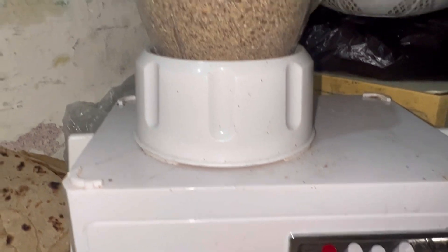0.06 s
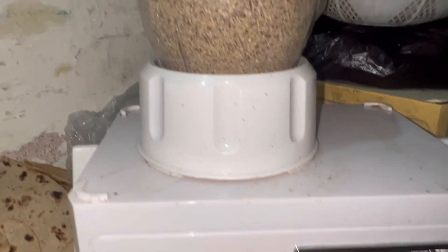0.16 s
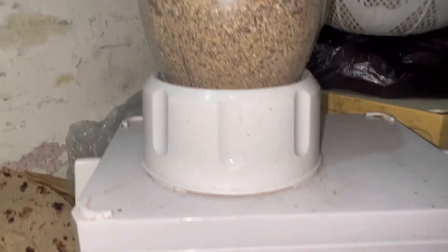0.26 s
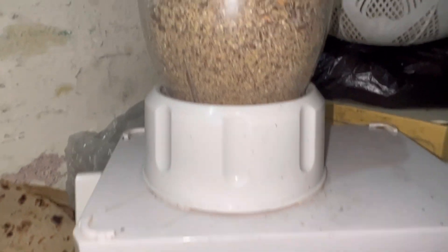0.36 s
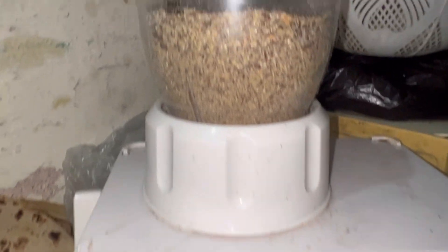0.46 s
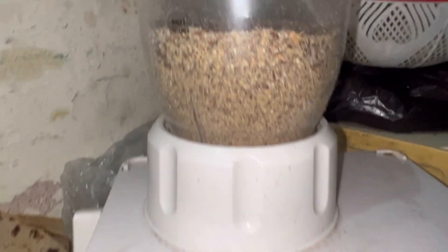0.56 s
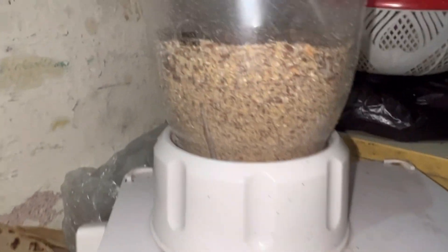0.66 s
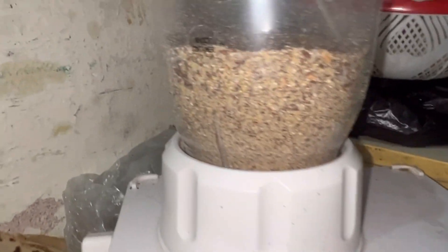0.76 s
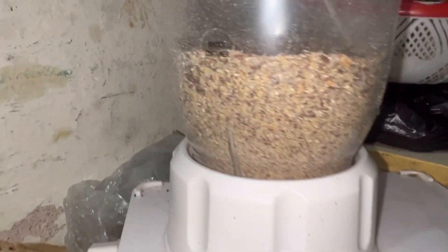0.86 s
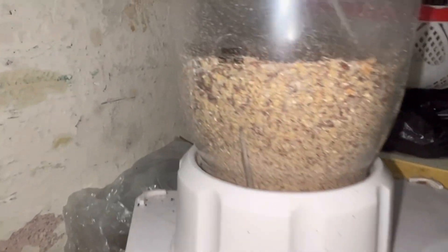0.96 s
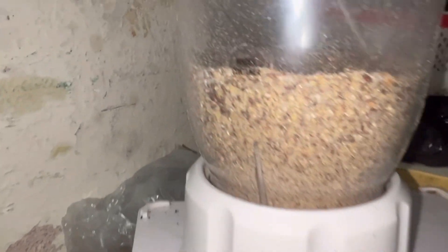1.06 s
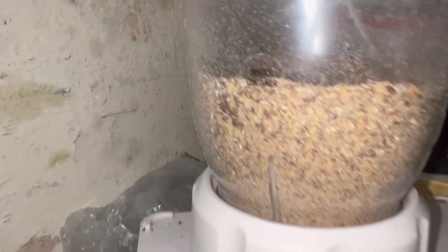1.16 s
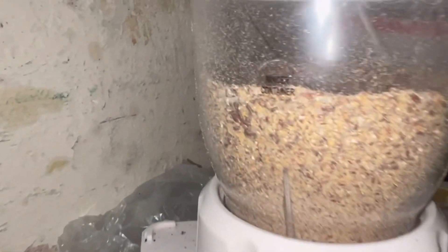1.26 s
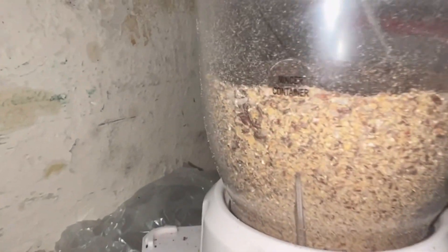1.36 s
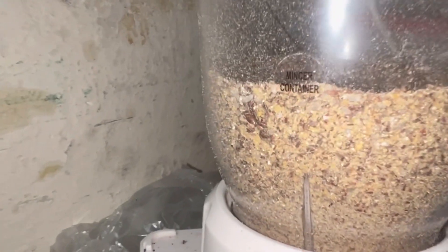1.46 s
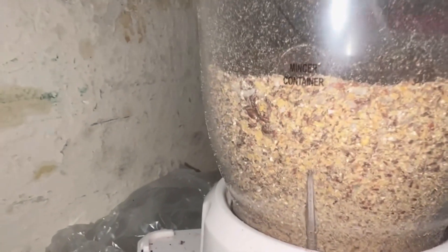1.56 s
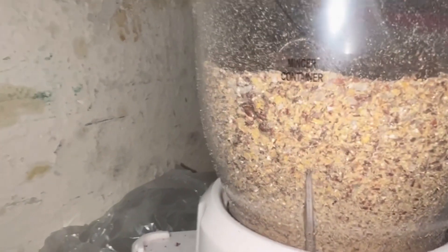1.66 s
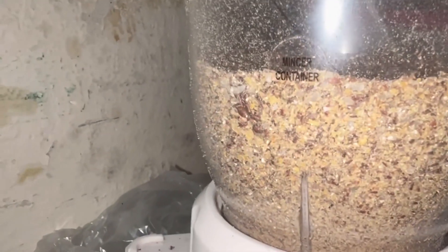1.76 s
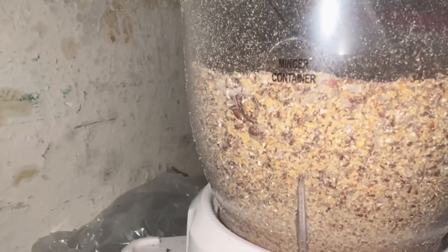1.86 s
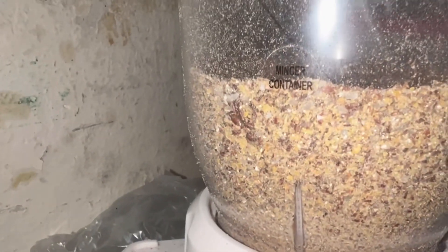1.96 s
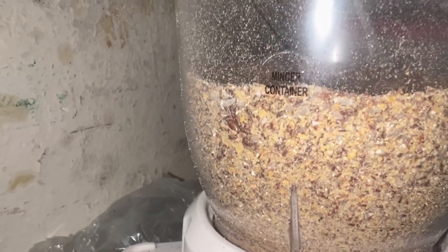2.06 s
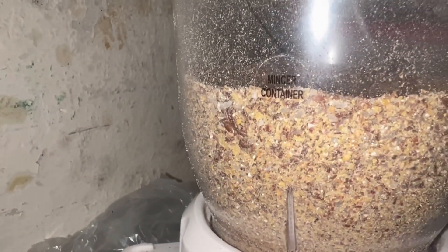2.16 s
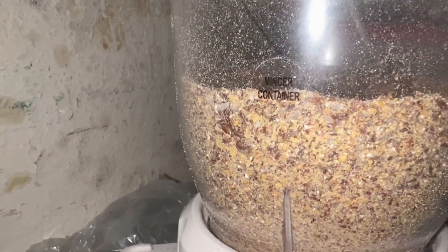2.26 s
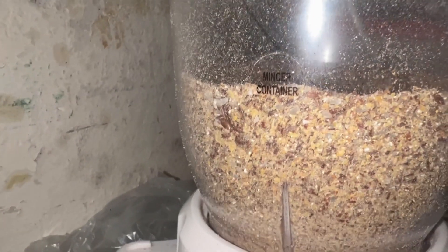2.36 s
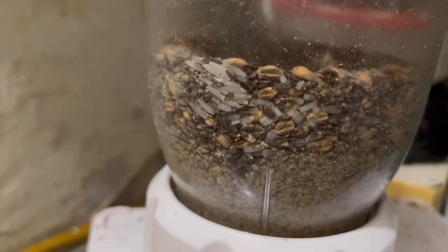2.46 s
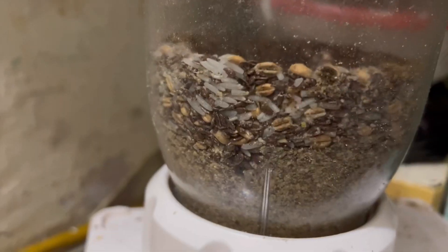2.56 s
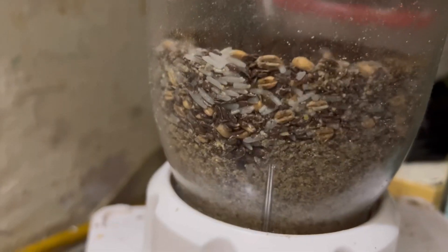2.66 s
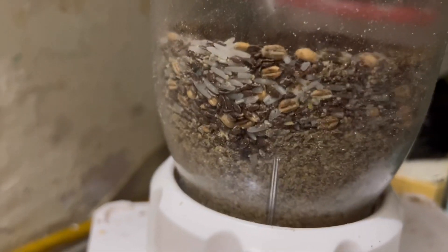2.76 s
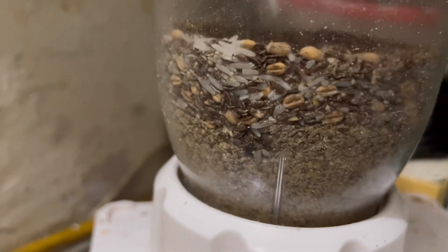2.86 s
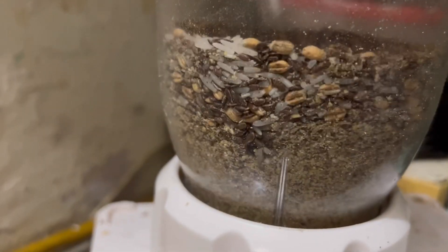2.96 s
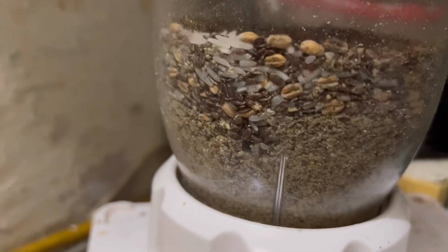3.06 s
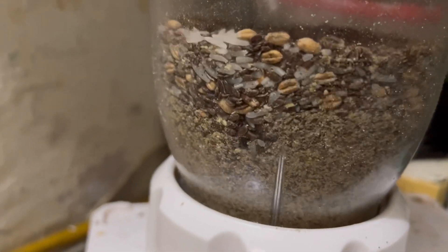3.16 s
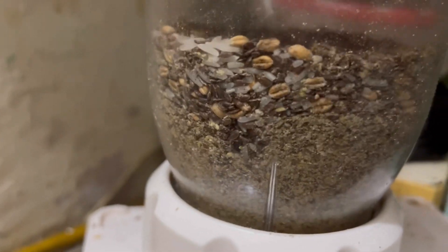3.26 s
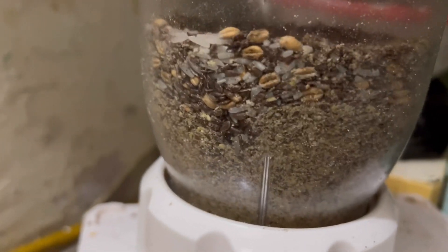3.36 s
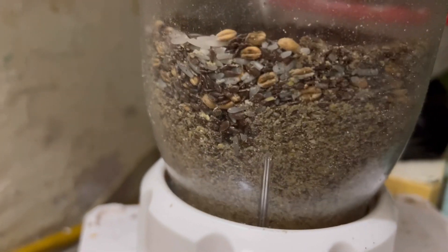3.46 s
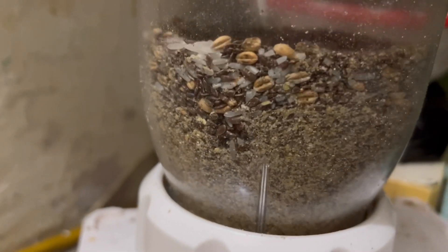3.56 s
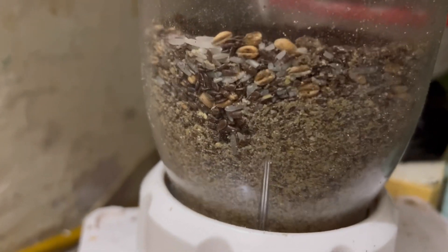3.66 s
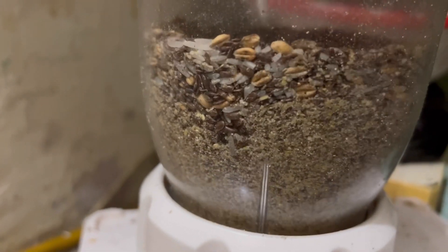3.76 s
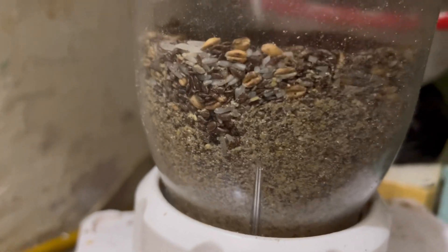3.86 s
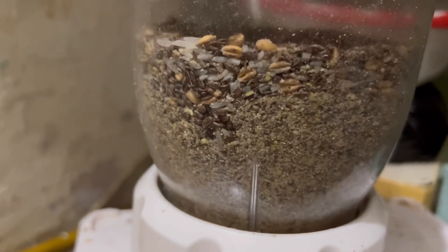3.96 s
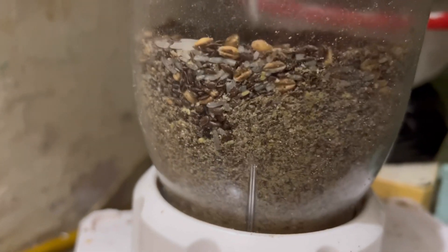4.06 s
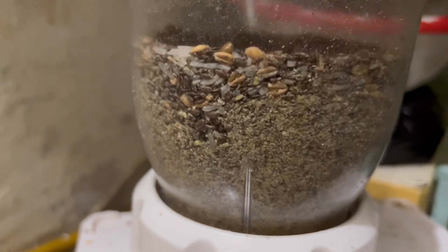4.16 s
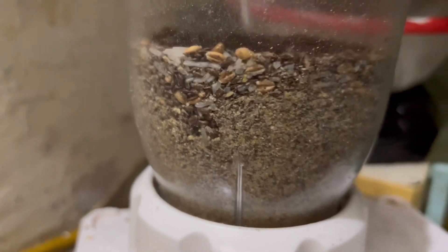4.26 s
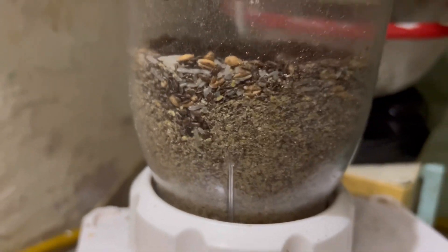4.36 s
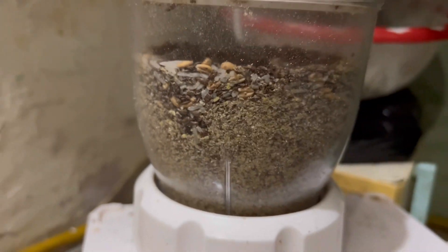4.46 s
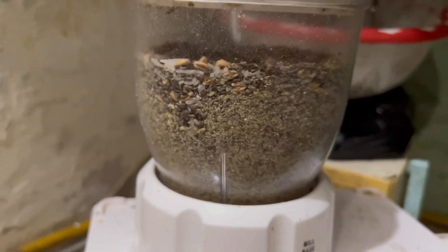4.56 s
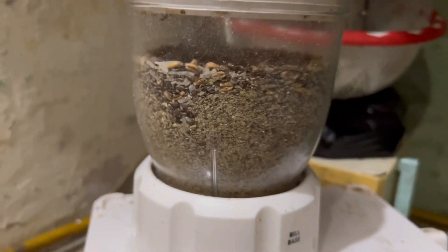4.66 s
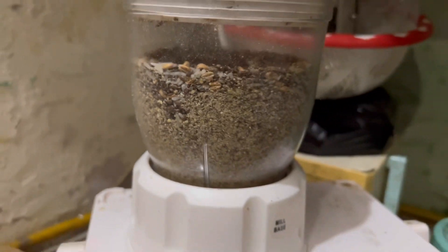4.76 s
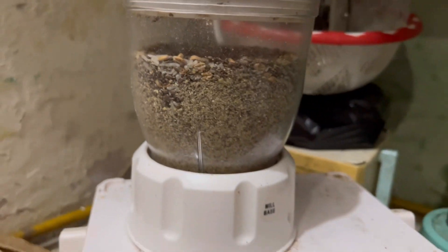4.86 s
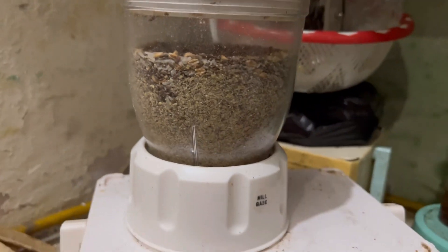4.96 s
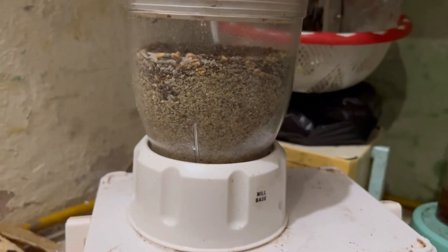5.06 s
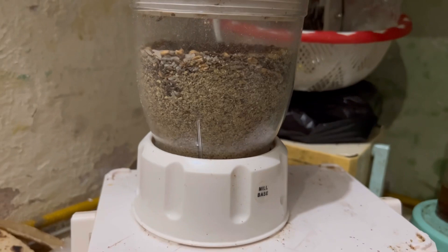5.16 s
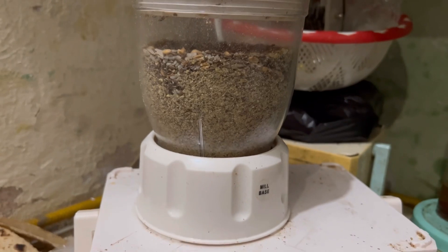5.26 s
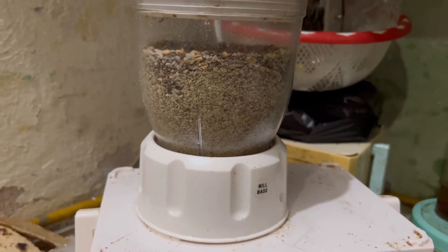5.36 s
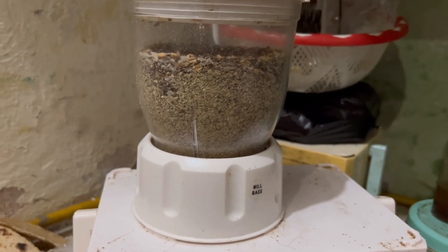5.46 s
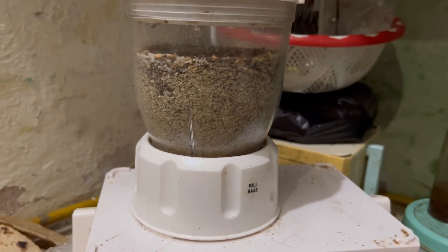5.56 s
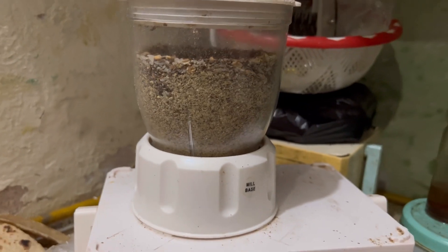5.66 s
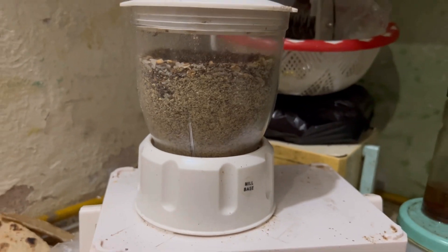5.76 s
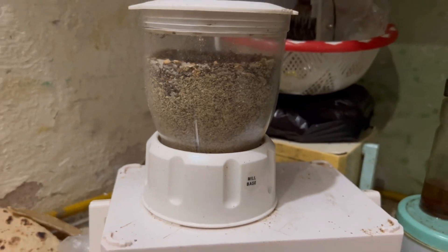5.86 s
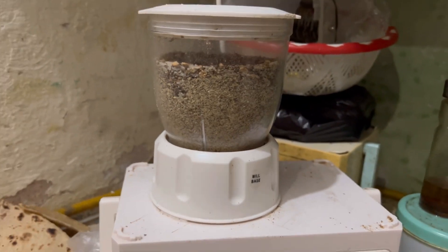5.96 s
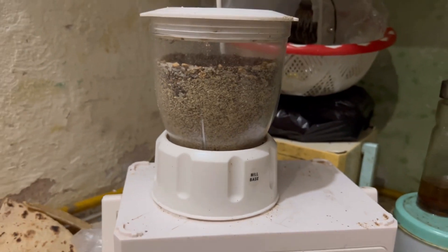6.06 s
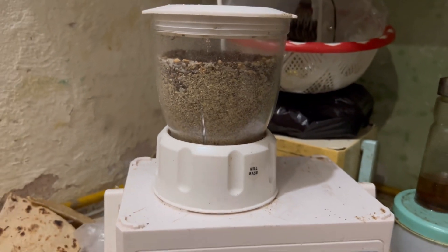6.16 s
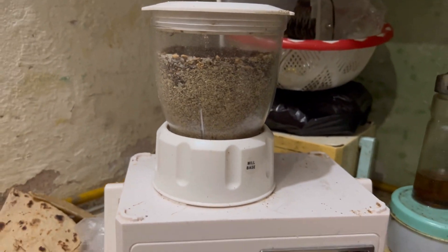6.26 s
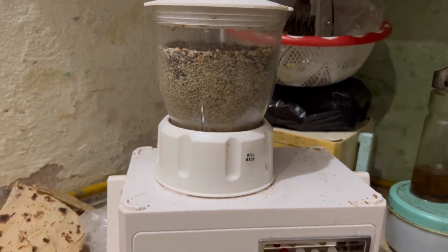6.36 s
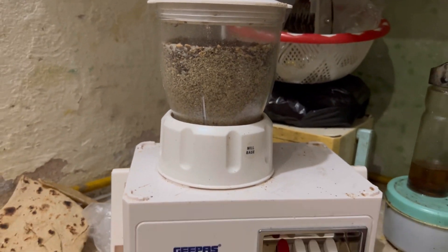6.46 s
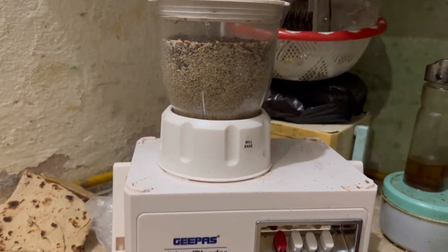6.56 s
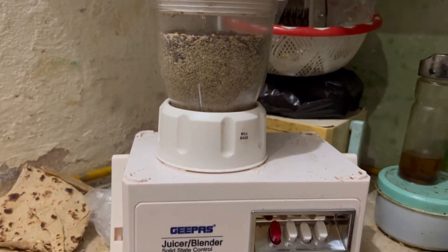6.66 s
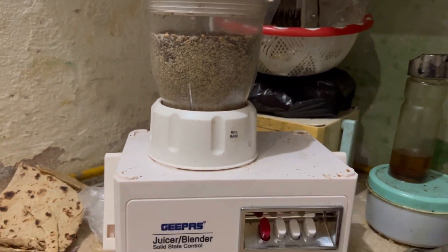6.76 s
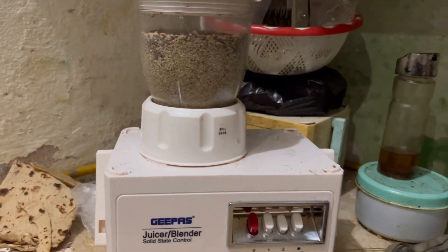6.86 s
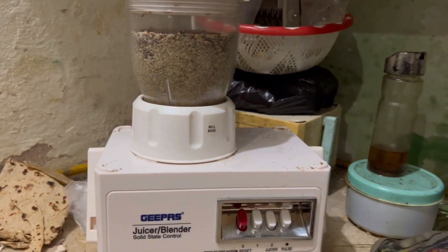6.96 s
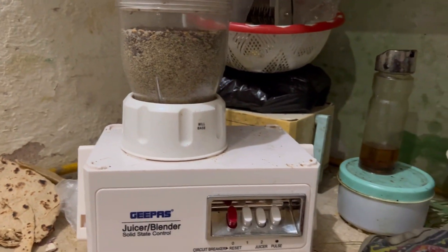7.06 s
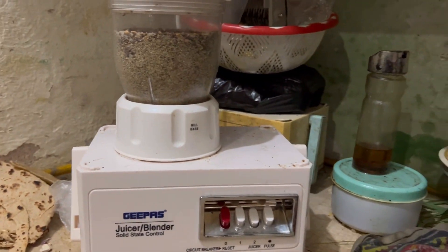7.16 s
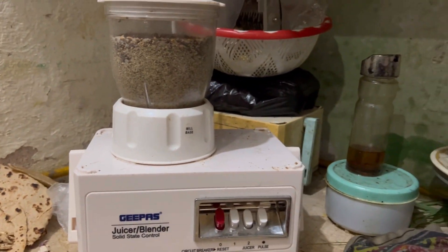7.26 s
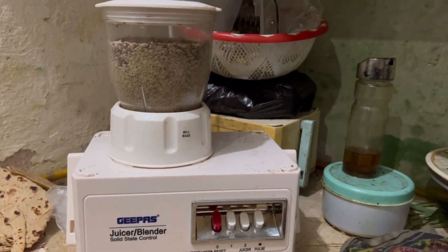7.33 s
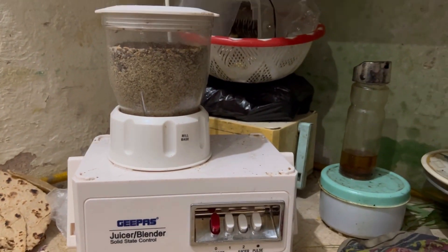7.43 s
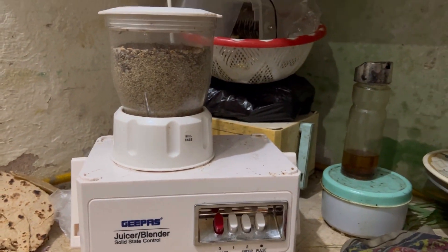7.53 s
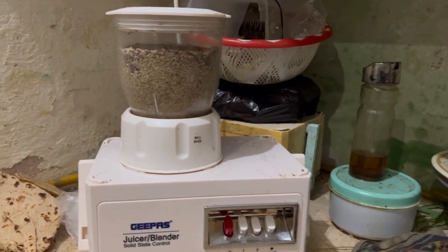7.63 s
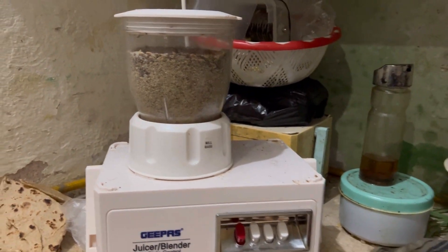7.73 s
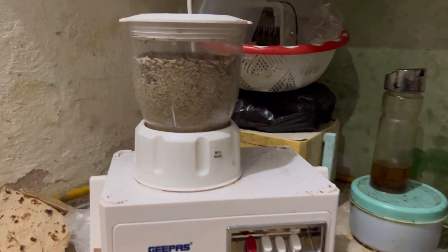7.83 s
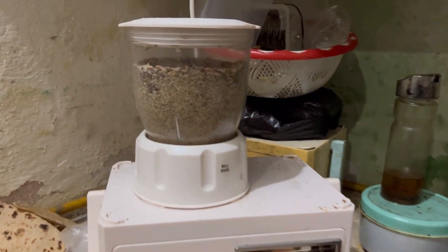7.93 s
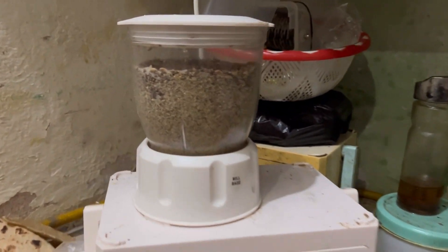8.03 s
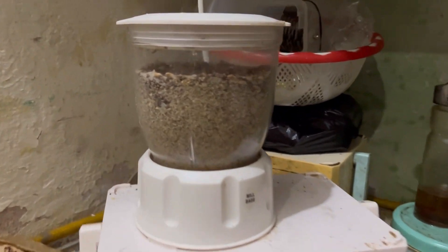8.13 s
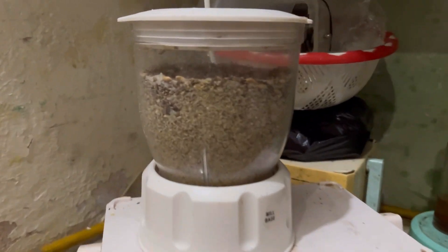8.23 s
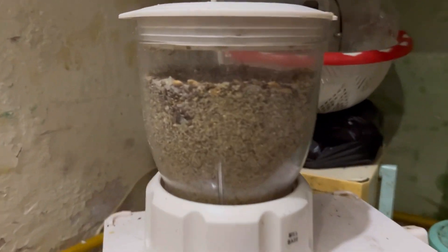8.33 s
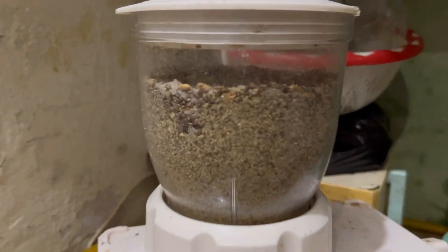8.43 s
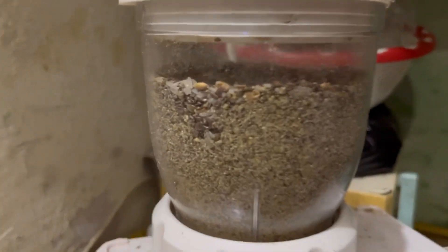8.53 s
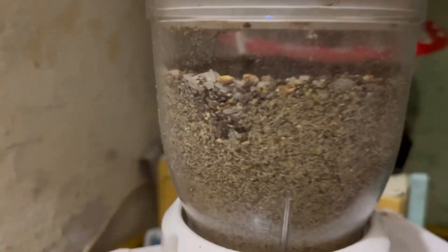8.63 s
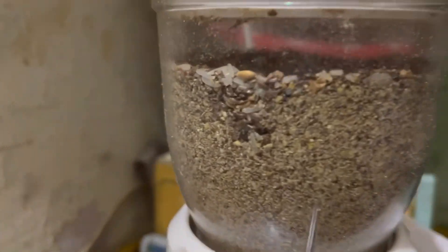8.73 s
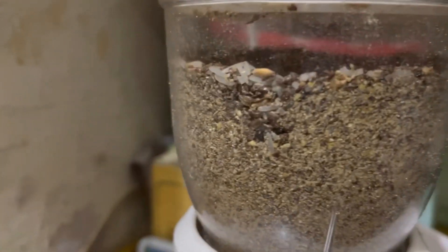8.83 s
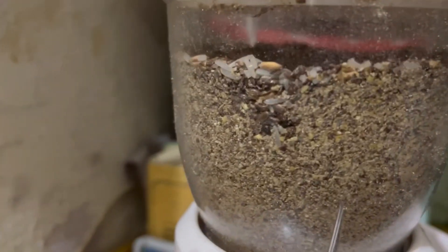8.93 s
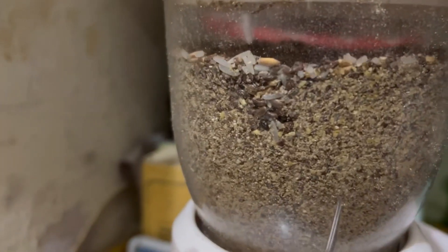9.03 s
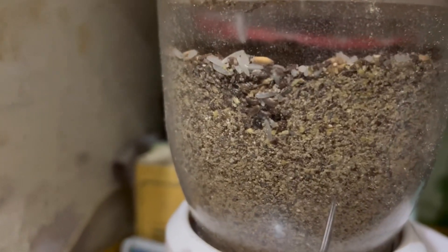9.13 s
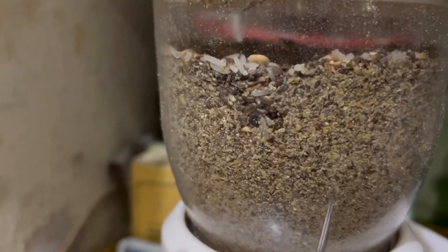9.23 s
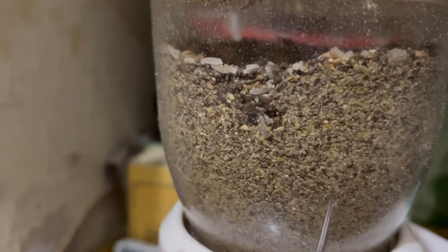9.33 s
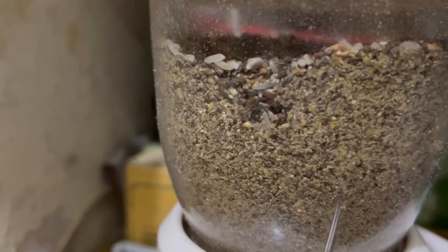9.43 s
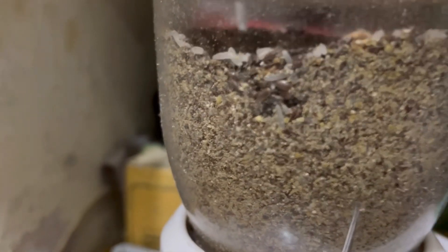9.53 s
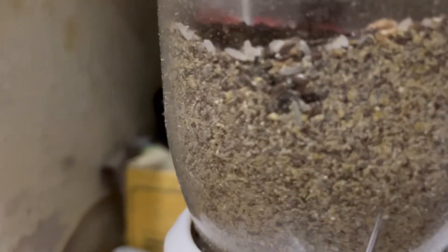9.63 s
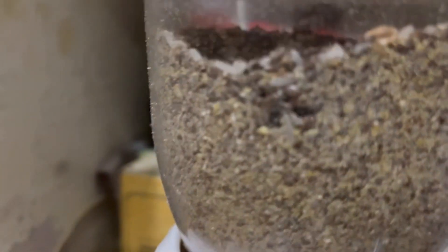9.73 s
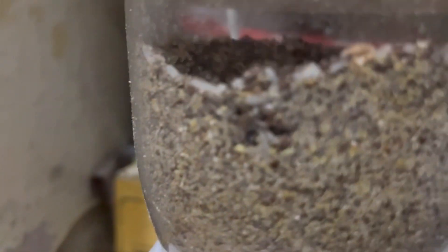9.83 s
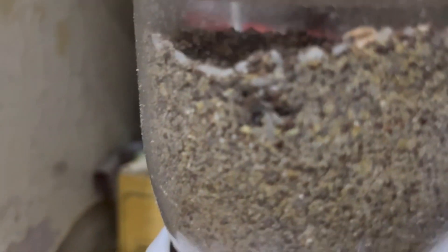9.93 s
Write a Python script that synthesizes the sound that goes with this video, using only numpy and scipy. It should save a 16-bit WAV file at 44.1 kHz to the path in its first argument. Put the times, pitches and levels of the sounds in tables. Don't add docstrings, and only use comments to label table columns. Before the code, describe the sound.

An electric grinder runs continuously with dry grain in its jar, heard close in a small hard-walled kitchen. A low motor hum sits under a dense gritty rush and occasional hard seed knocks. Around 2.4 seconds it cuts abruptly to a higher speed, hissier and with less hum. The microphone draws back, so the noise softens, then moves in again and it grows loud to the end.

```python
import sys
import numpy as np
from scipy import signal
from scipy.fft import rfft, irfft, next_fast_len
from scipy.io import wavfile
from scipy.ndimage import uniform_filter1d, map_coordinates

SR = 44100
rng = np.random.default_rng(int(sys.argv[2]) if len(sys.argv) > 2 else 0)


def to_wav(s):
    ch = np.atleast_2d(s).T
    pcm = np.round(np.clip(ch, -1, 1) * 32767)
    wavfile.write(sys.argv[1], SR, pcm.astype(np.int16))


def volts(x):
    e = np.asarray(x, float) / 20
    return 10 ** e


N = 440554
T = np.arange(N) / SR
CUT_S = 2.4333
TAPS = 8192


def curves(table):
    s, *columns = np.transpose(table)
    return [np.interp(T, s, c) for c in columns]


def at_places(place, table):
    return [np.interp(place, range(len(c)), c) for c in np.transpose(table)]


def unit(x):
    return x / np.sqrt(np.mean(x ** 2))


def walk(rate):
    k = max(int(SR / rate), 2)
    held = np.repeat(rng.standard_normal(size=1000)[:N // k + 1], k)
    return unit(uniform_filter1d(uniform_filter1d(held, k), k)[:N])


def shaft_speed(slow):
    # t/s, shaft f/Hz
    low_speed = [
        (0.0, 173.7),
        (0.11, 177.3),
        (1.47, 179.9),
        (2.43, 181.4),
    ]
    # t/s, shaft f/Hz
    high_speed = [(2.46, 294), (2.9, 290.3), (4.25, 292), (5.8, 286.5), (6.45, 292.5), (7.02, 311),
                  (7.3, 300), (7.7, 292), (8.08, 298), (8.4, 293), (8.7, 280), (9.3, 282), (9.55, 278.5),
                  (9.99, 282)]
    wander_hz = 1.0
    return np.where(slow, *curves(low_speed), *curves(high_speed)) + ~slow * wander_hz * walk(4)


def motor(turn, slow, place, shaft_db, buzz_db, ripple_db):
    # multiple of the shaft rate, level/dB under the shaft line
    even_orders = [
        (2, -21.5),
        (4, -19.5),
        (6, -21),
        (8, -17.5),
        (12, -27),
    ]
    # third multiple level/dB, fifth multiple level/dB
    odd_orders = [
        (-40, -42),
        (-38, -35),
    ]
    mains_hz, pan_db, lead_rad = 50.05, 3.5, -0.21
    side = np.array([[1], [-1]])
    field = 2 * np.pi * 2 * mains_hz * T
    spin = turn + 0.15 * walk(25) - side * lead_rad / 2
    ripple = sum(volts(ripple_db + db) * np.sin(spin + k * field) for k, db in ((-1, 0), (1, -7)))
    shaft = volts(shaft_db + np.where(slow, 0.45, 1.1) * walk(16)) * (np.sin(spin) + ripple)
    third_db, fifth_db = at_places(place, odd_orders)
    orders = [(3, third_db), (5, fifth_db)] + [(k, shaft_db + db) for k, db in even_orders]
    upper = 0
    for k, db in orders:
        level = volts(db + 1.1 * np.sqrt(k) * walk(14))
        upper = upper + level * np.sin(k * turn + 0.15 * k * walk(18))
    buzz = volts(buzz_db + 1.1 * walk(10)) * np.sin(np.where(slow, 1, 2) * field)
    return np.sqrt(2) * (shaft + slow * upper + buzz) * volts(side * pan_db / 2)


def knocks(level_db):
    # t/s, peak level/dB
    hard_seeds = [(0.4674, -16), (1.059, -14), (1.5689, -8.5), (2.3224, -11), (2.601, -13), (2.8907, -17),
                  (3.2411, -14), (3.5144, -15), (4.2352, -12), (4.3464, -22), (5.5434, -23), (5.576, -26),
                  (5.6885, -18), (6.3493, -22), (7.2644, -20), (8.4523, -18), (9.0298, -11), (9.5597, -13),
                  (9.648, -10)]
    out = np.zeros(N)
    tail = np.arange(900) / SR
    decay = np.exp(-tail / 0.0018) + 0.5 * np.exp(-tail / 0.0097)
    for s, db in hard_seeds:
        i = int(s * SR)
        burst = rng.standard_normal(len(tail)) * decay
        out[i:i + len(tail)] += volts(db - level_db[i] - 7.0) * burst[:N - i]
    return out


def seeds(turn, slow, count):
    size = next_fast_len(N + 4096)
    f = np.arange(size // 2 + 1) * SR / size
    surge = 0.33 * walk(14) + 0.65 * walk(45)
    sizes = rng.exponential(size=(count, N // 8 + 1)).clip(0, 6)
    sizes = volts(1.99 * np.repeat(sizes, 8, axis=1)[:, :N])
    hits = rfft(unit(rng.standard_normal((count, N)) * sizes), size)
    once, twice = 0.093, np.where(slow, 0.15, 0.06)
    out = 0
    for hz in 250 * 2.0 ** np.arange(7):
        distance = np.log2(np.clip(f, 250, 16000) / hz)
        octave = np.cos(np.pi / 2 * np.clip(distance, -1, 1)) ** 2
        treble = np.clip(np.log2(hz / 700) / 4, 0, 1)
        blade = 1 + treble * (once * np.cos(turn) + twice * np.cos(2 * turn))
        flicker = 0.24 * walk(5.4) + 0.46 * walk(22)
        load = volts(np.sqrt(treble + 0.067) * surge + flicker) * blade
        out = out + load * irfft(hits * octave, size)[:, :N]
    return out


def jar_ring(air, jar):
    f = np.arange(TAPS // 2 + 1) * SR / TAPS
    air_hz, air_db = np.transpose(air)
    db = np.interp(np.log(f + 1), np.log(air_hz), air_db)
    db = db + sum(lift / (1 + (2 * (f - hz) / width) ** 2) for hz, width, lift in jar)
    cepstrum = irfft(np.log(volts(db)))
    cepstrum[1:TAPS // 2] *= 2
    cepstrum[TAPS // 2 + 1:] = 0
    return irfft(np.exp(rfft(cepstrum)))


def kitchen_bounces():
    decay = np.exp(-np.arange(TAPS) / SR / 0.011)
    bounces = volts(-35.5) * np.diff(rng.standard_normal(TAPS + 1)) * decay
    bounces[0] = 1
    return bounces


def heard(streams, air, jar, ports):
    size = next_fast_len(streams.shape[1] + TAPS)
    f = np.arange(size // 2 + 1) * SR / size
    ring = rfft(jar_ring(air, jar), size) * rfft(kitchen_bounces(), size)
    middle = (f > 600) & (f < 9000)
    ring /= np.sqrt(np.sum(np.abs(ring[middle]) ** 2) / len(f))
    direct, *spread = rfft(streams, size)
    port_hz, *columns = np.transpose(ports)
    like, lead, pan_db = (np.interp(f, port_hz, c) for c in columns)
    like = np.clip(like, 0, 1)
    pair = []
    for side, own in zip((1, -1), spread):
        shared = np.sqrt(like) * np.exp(-0.5j * side * lead) * direct
        pair.append(volts(side * pan_db / 2) * (shared + np.sqrt(1 - like) * own))
    return irfft(ring * np.array(pair), size)[:, :streams.shape[1]]


def phone_places():
    # f/Hz, level/dB
    slow_air = [(30, -42), (70, -23.5), (130, -16.5), (250, -19.5), (650, -14), (1250, -13), (2500, -12.5),
                (4000, -15), (6500, -19), (8500, -16.5), (11500, -20.5), (12500, -23), (15500, -26)]
    fast_air = [(30, -57), (80, -40), (130, -32.5), (180, -21), (450, -17.5), (900, -18), (1550, -11),
                (2600, -11), (4500, -10), (7600, -15.5), (10000, -12.5), (13000, -16), (15600, -15.5)]
    # f/Hz, width/Hz, lift/dB at places 0, 1
    slow_jar = [(337, 94, 12.5, 14.3), (944, 126, 8, 13), (1067, 120, 8.5, 5.7), (1430, 210, 6.5, 5.8),
                (1824, 120, 2, 13.5), (2100, 72, 3, 1.3333), (2833, 220, 13, 6.3), (3070, 160, 1, 8.8),
                (5220, 156, 12.5, 10.8), (5440, 150, 8, 4.3), (7740, 250, -1, 5.3), (9740, 300, 7, 2.8),
                (11100, 1100, 3.5, 4.8)]
    # f/Hz, width/Hz, lift/dB (negative: dip) at places 2, 3, 4, 5
    fast_resonances = [(706, 330, 12.5, 12.5, 11, 14), (844, 120, -9, -9.5, -8.5, -9),
                       (1364, 310, 8.5, 12, 12, 9.5), (1540, 73, -5, -13, -4.5, -4.5),
                       (1712, 44, 4.5, 8.5, -7, 9), (1890, 252, 12.5, 8.5, 6, 12.5),
                       (2256, 120, 2, 6.5, 4, 4.5), (2683, 120, 7.5, 1.5, 2, 5), (2980, 220, -3, 1, -3, 1.5),
                       (3599, 157, 11.5, 2, 2.5, 10.5), (3900, 92, -11, -6, 8, -4),
                       (4030, 400, 3, -0.5, -3.5, 0.5),
                       (4930, 120, -10, 6, -1, -1.5), (5550, 260, 9, 5, 8.5, 9.5), (5920, 120, 3, 9.5, 7.5, 6),
                (6520, 530, 9, 8.5, 4.5, 6.5), (7780, 620, -1, 6, 3, 4), (8800, 260, -3, -9, -1, -15),
                (9350, 230, 6.5, 1.5, 2, 4), (10480, 360, -1, 7.5, 5, 6.5), (11050, 680, 1, 5.5, 7, -0.5),
                (12450, 560, 7.5, 4, 1, 6.5), (13500, 400, -9, 1, -5.5, -3), (15400, 760, 7, 2, 3, 5)]
    # f/Hz, likeness/0-1, right leads/rad, left minus right/dB
    slow_ports = [(60, 0.7, 0, 1), (250, 0.99, 0.45, 3.5), (920, 0.82, 0.3, 2.5), (1280, 0.31, 1, 2.5),
                  (1800, 0.7, 1.06, 3), (2620, 0.6, -1, 3.5), (3840, 0.94, 0.9, 2.2), (5200, 0.55, -0.3, 5),
                  (6500, 0.94, 0.5, 1), (8900, 0.88, 0.4, 0.5), (9820, 1, 3, 0), (10490, 1, 3.3, 0),
                  (11700, 1, 6, 0), (12600, 1, 6.6, 0), (13300, 1, 9.2, 0), (14300, 1, 9.6, 0),
                  (15100, 1, 12.4, 0)]
    near_ports = [(60, 0.9, -0.28, -1), (300, 0.79, 1, 5), (804, 1, -0.55, 0), (1570, 0.87, -0.63, 2.5),
                  (2620, 0.37, 0.98, 4.5), (3400, 0.59, 0.76, 4), (4500, 0.94, 0.43, 2.5),
                  (5500, 0.89, -1.25, 4.5), (6600, 0.48, -0.77, 4), (7100, 0.94, -0.2, 0),
                  (8600, 1, -0.58, 3.5), (10300, 0.3, 0, 6), (11800, 0.94, 0, -1), (14200, 0.98, 0, 0),
                  (15200, 0.69, -0.53, 1)]
    far_ports = [(60, .95, 2, 0), (300, 0.95, 0.3, -3), (800, 0.97, -0.2, 2), (1470, 0.96, -1, 2.5),
                 (1710, 0.76, -3, 4), (2180, 0.85, -0.9, 2), (3030, 0.58, 3.0, -0.5), (3300, 0.58, 3, 2),
                 (3700, 0.3, 0, 1), (4630, 0.64, -0.8, 3.5), (5400, 0.76, -0.5, 3), (7600, 0.85, -1.5, 2.5),
                 (10300, 0.27, 0.9, 5.5), (12300, 0.99, -1, -1.5), (15200, 0.67, 0.5, 4)]
    half_way = near_ports[:6] + far_ports[9:]
    slow_rings, fast_rings = np.array(slow_jar), np.array(fast_resonances)
    places = [(slow_air, slow_rings[:, [0, 1, k]], slow_ports) for k in (2, 3)]
    for k, ports in zip((2, 3, 4, 5), (near_ports, half_way, far_ports, near_ports)):
        places.append((fast_air, fast_rings[:, [0, 1, k]], ports))
    return places


def grinding(streams, place, hiss_db):
    grind = np.zeros((2, N))
    for k, colour in enumerate(phone_places()):
        share = np.clip(1 - abs(place - k), 0, 1) ** 0.93
        on = np.flatnonzero(abs(place - k) < 1.2)
        span = slice(max(on[0] - TAPS, 0), on[-1] + 1)
        grind[:, span] += share[span] * heard(streams[:, span], *colour)
    sway_ms, sways_per_s = 1.2, 2.5
    sway = np.arange(N) + sway_ms * SR / 1000 * walk(sways_per_s)
    grind = np.array([map_coordinates(port, [sway], order=3, mode="mirror") for port in grind])
    hiss = signal.sosfilt(signal.butter(6, 9000, "high", fs=SR, output="sos"), grind)
    return grind + hiss * (volts(hiss_db) - 1)


def scene():
    # t/s, level/dB
    grind_level = [(0, -24.7), (.8, -25), (1.55, -22.5), (2.43, -23.5), (2.44, -23), (3.2, -25),
                   (3.8, -24.5), (5, -28.5), (5.5, -30), (5.9, -28.7), (6.3, -31.5), (7.7, -31.3),
                   (8.05, -29), (8.7, -24.5), (9.1, -23.5), (9.45, -25), (9.7, -23.5), (10, -23.5)]
    # t/s, place (0 housing, 1 jar; then 2 over the jar, 3 half way, 4 far, 5 jar wall)
    phone_path = [(0, 0), (.35, .1), (.6, .5), (1.05, 1), (2.43, 1), (2.44, 2), (4.1, 2.1), (5.4, 3),
                  (6.1, 3.1), (7.3, 4), (7.7, 4), (8.15, 4.55), (8.7, 5), (10, 5)]
    # shaft line level/dB, field buzz level/dB, dust hiss lift/dB, ripple level/dB under the shaft
    place_levels = [
        (-29.5, -44.5, 0, -40),
        (-27, -48, 0, -40),
        (-39.5, -50.5, -0.5, -18),
        (-44, -52.5, 1, -17),
        (-44.5, -52, 0, -24),
        (-36.5, -46.5, -.5, -14),
    ]
    slow = T < CUT_S
    hz = shaft_speed(slow)
    turn = 2 * np.pi * np.cumsum(hz) / SR
    level_db, = curves(grind_level)
    place, = curves(phone_path)
    place = np.where(slow, np.clip(place, 0, 1), np.clip(place, 2, 5))
    shaft_db, buzz_db, hiss_db, ripple_db = at_places(place, place_levels)
    unbalance_db_per_hz, cruise_hz = 0.22, 294.8
    shaft_db = shaft_db + ~slow * unbalance_db_per_hz * (hz - cruise_hz)
    hum = motor(turn, slow, place, shaft_db, buzz_db, ripple_db)
    streams = seeds(turn, slow, count=3)
    streams[0] += knocks(level_db)
    grind = volts(level_db + 1.5) * grinding(streams, place, hiss_db)
    fade_in_s = 0.025
    fade = np.where(slow, 1, np.clip(0.051 + (T - CUT_S) / fade_in_s, 0, 1))
    return fade * (grind + hum)


def band_limit(x):
    return signal.sosfilt(signal.butter(12, 17080, fs=SR, output="sos"), x)


def record(dry):
    top_cut = signal.ellip(16, 0.3, 90, 15720, fs=SR, output="sos")
    return band_limit(signal.sosfilt(top_cut, dry))


dry = scene()
out = record(dry)
to_wav(out)
```